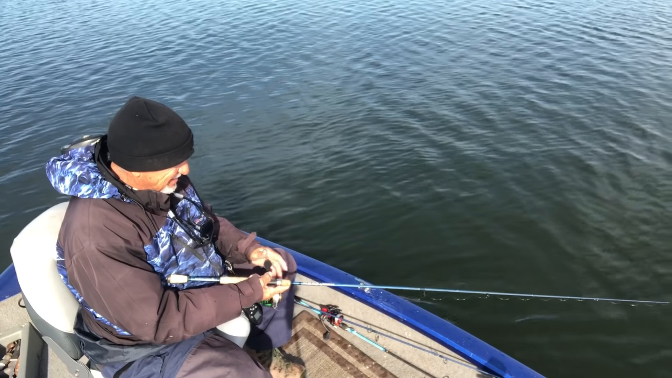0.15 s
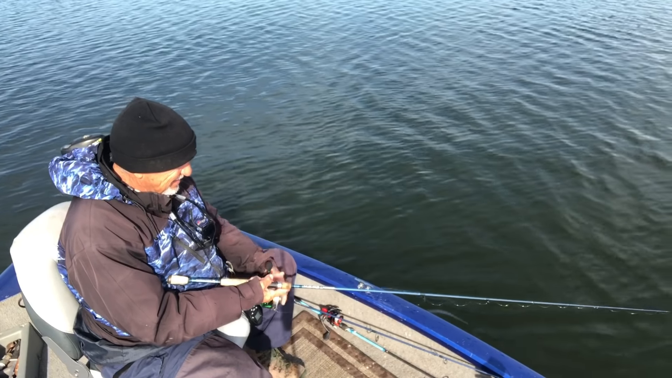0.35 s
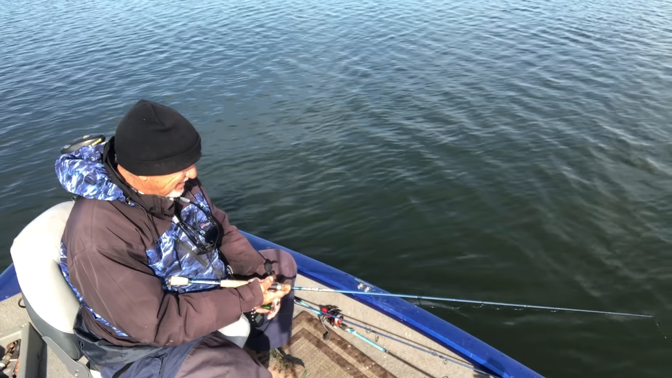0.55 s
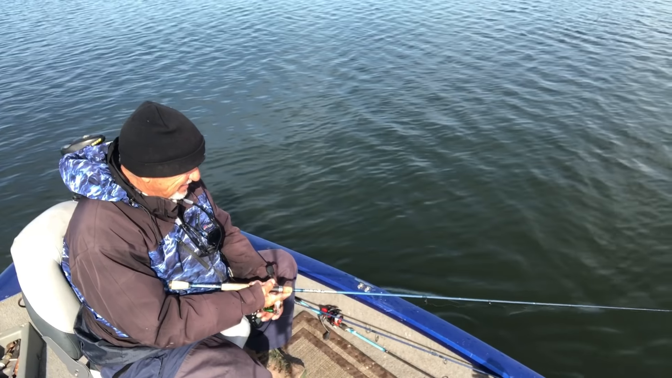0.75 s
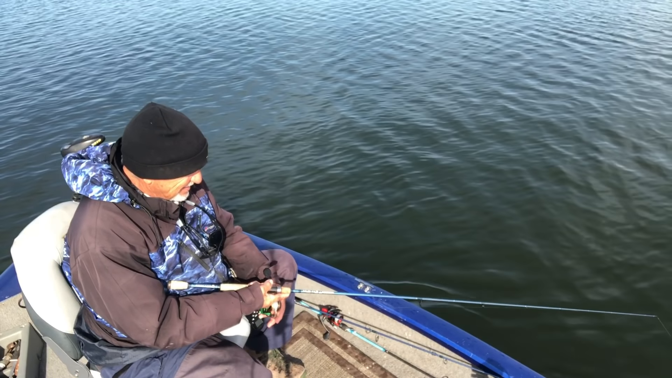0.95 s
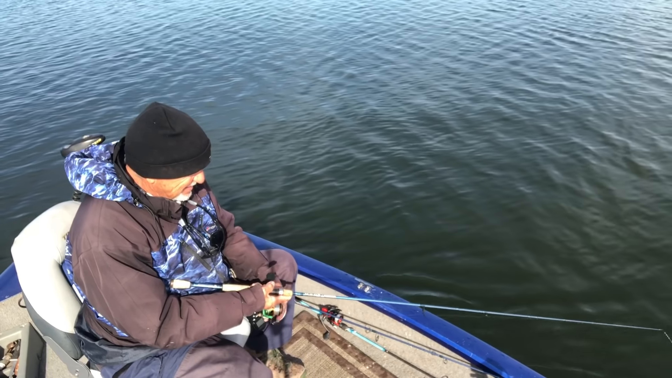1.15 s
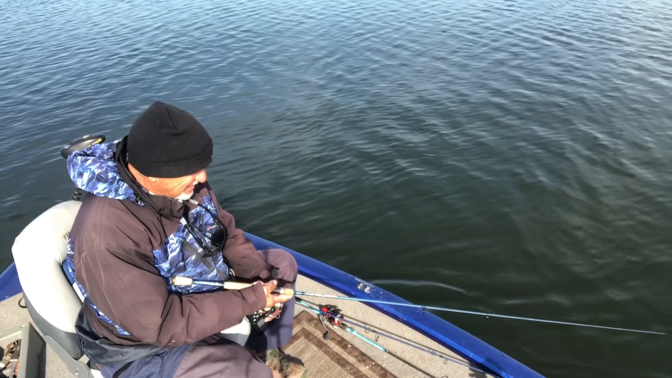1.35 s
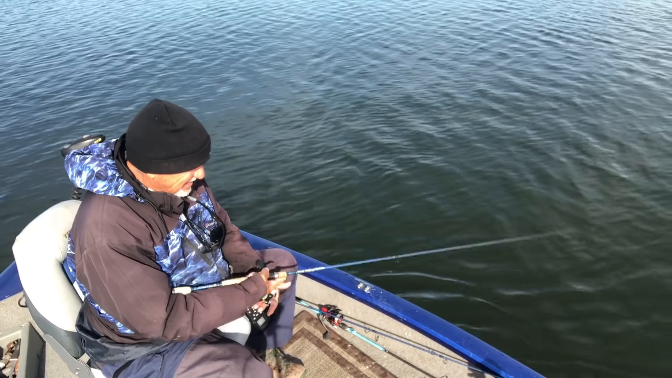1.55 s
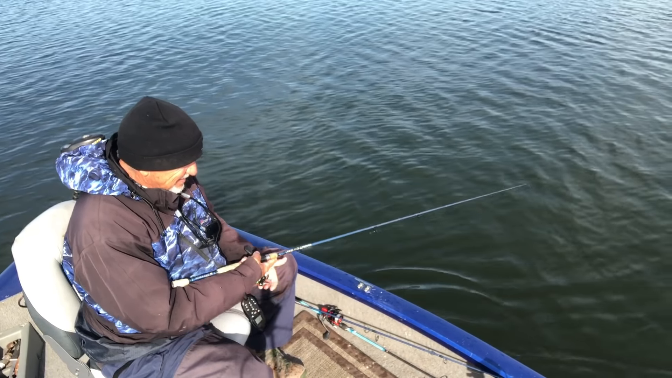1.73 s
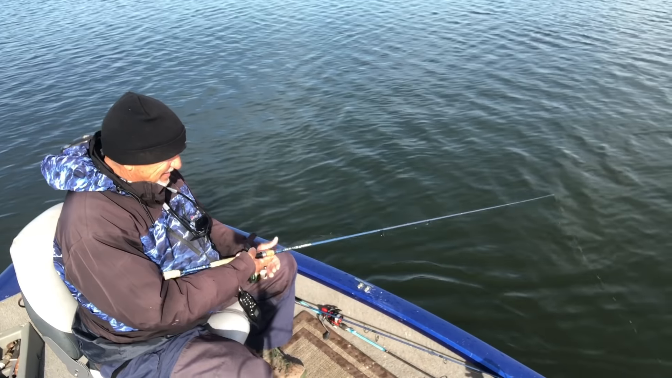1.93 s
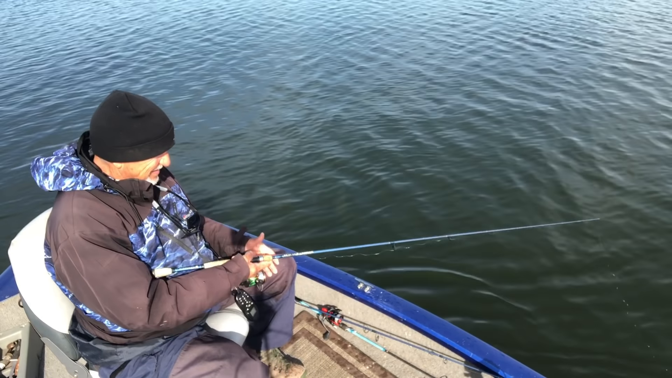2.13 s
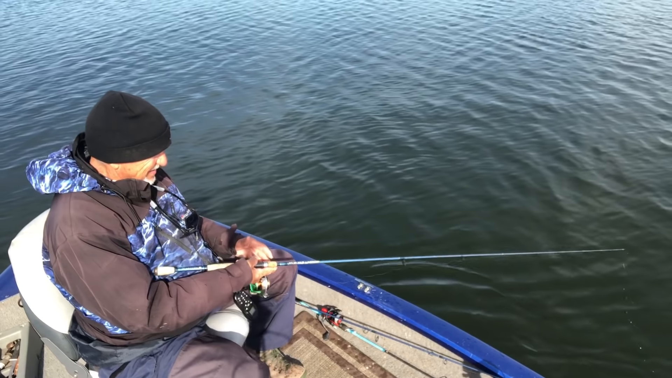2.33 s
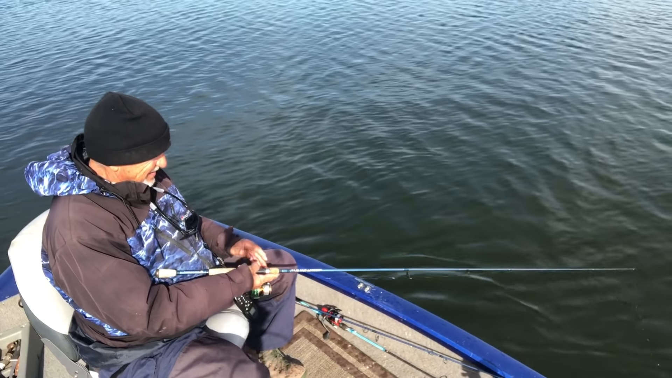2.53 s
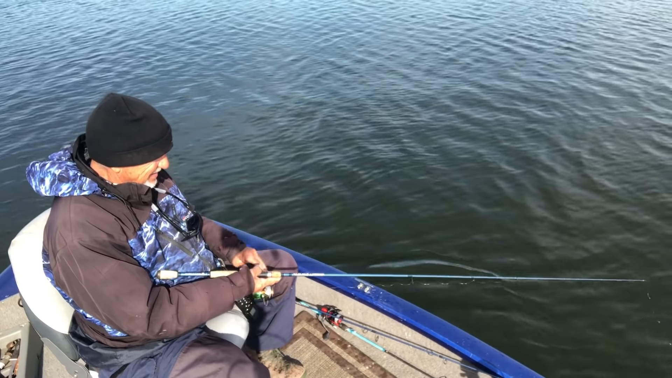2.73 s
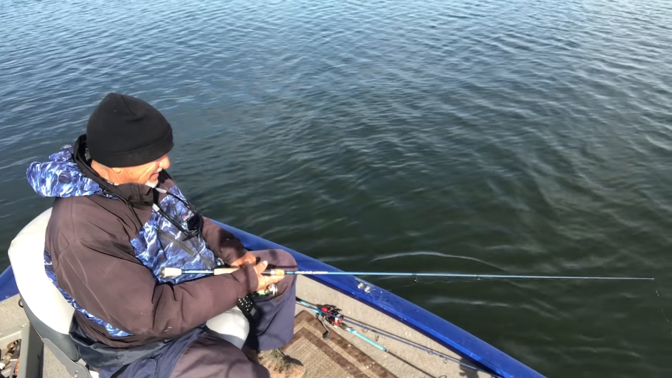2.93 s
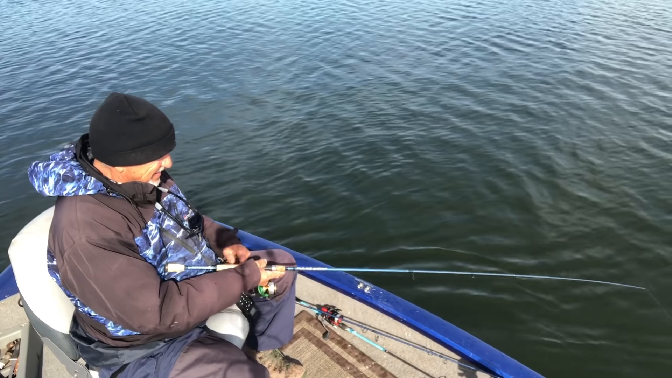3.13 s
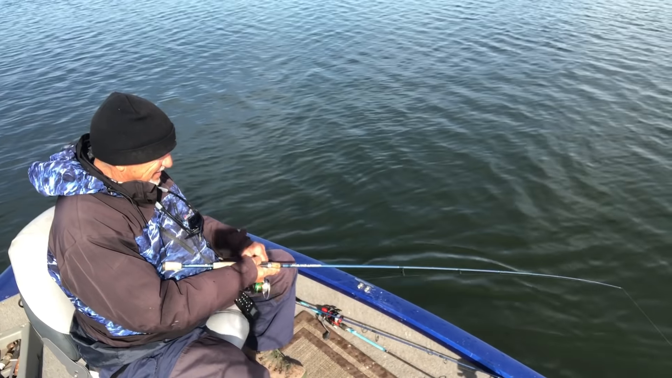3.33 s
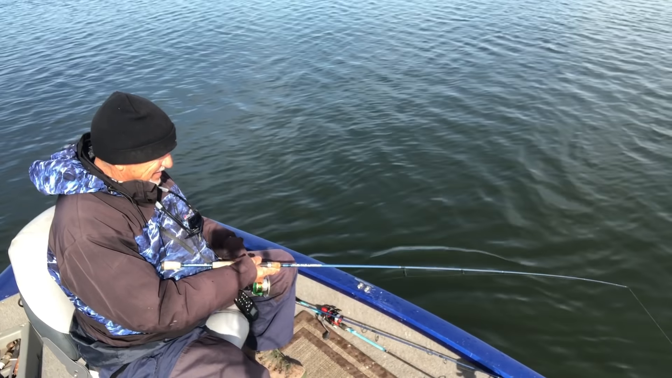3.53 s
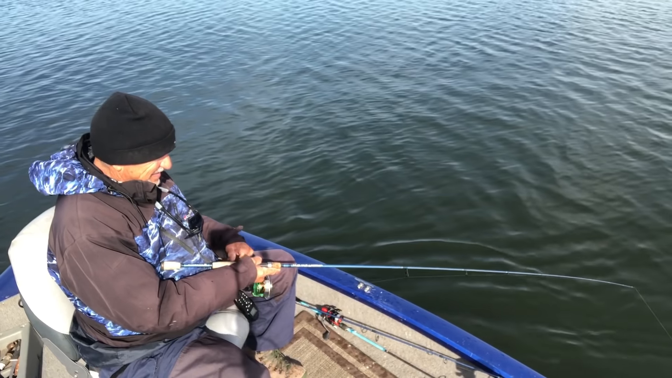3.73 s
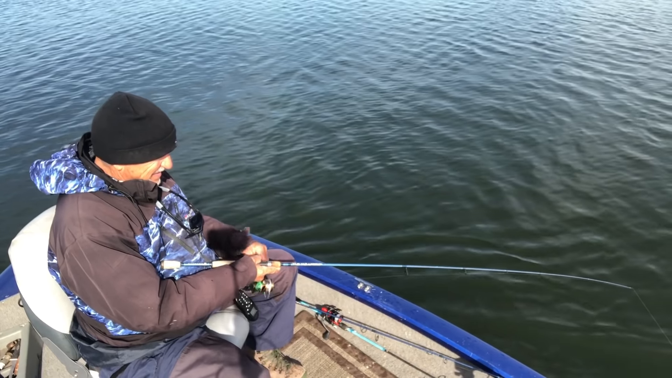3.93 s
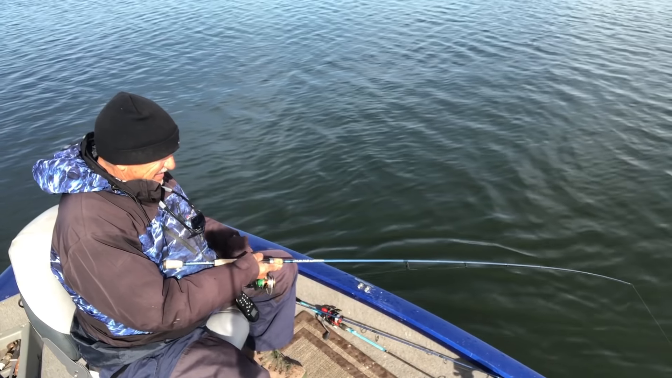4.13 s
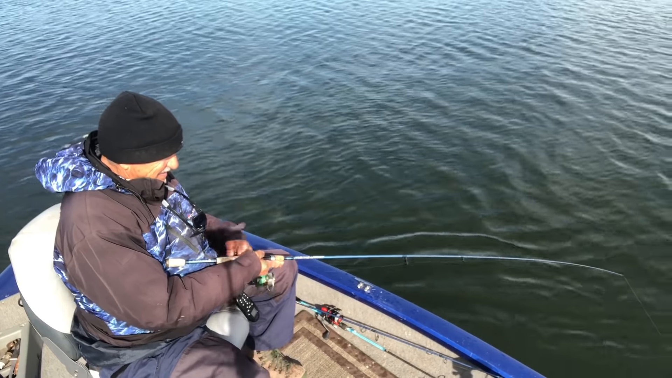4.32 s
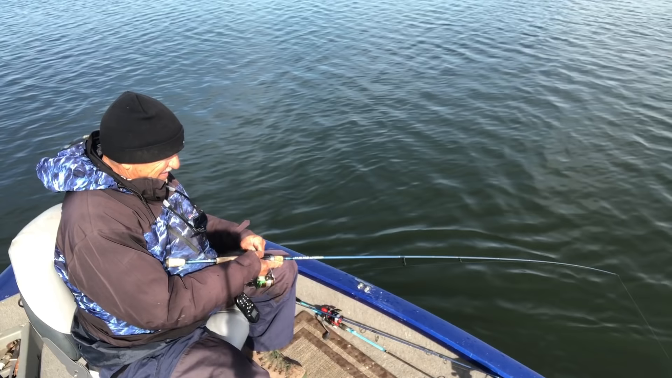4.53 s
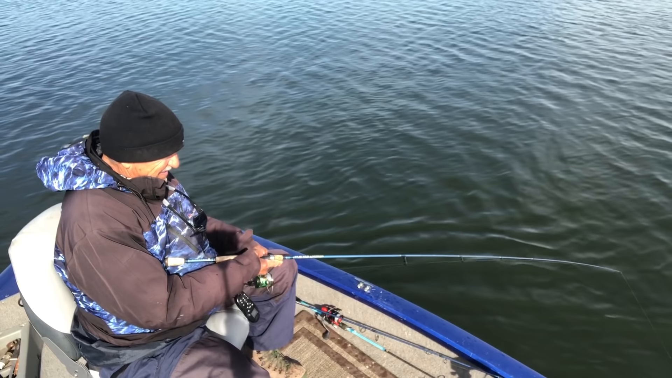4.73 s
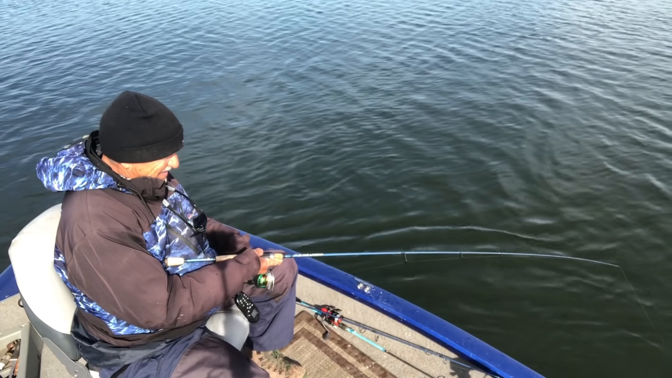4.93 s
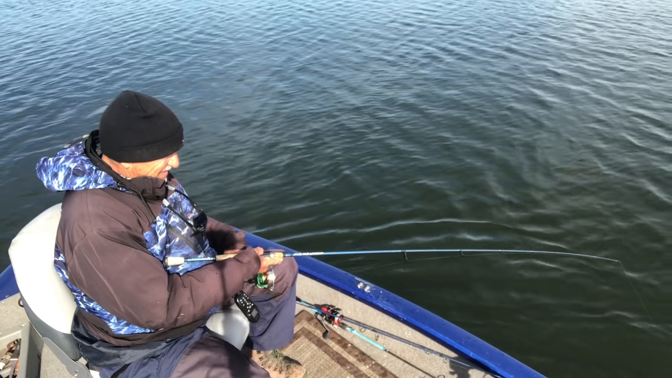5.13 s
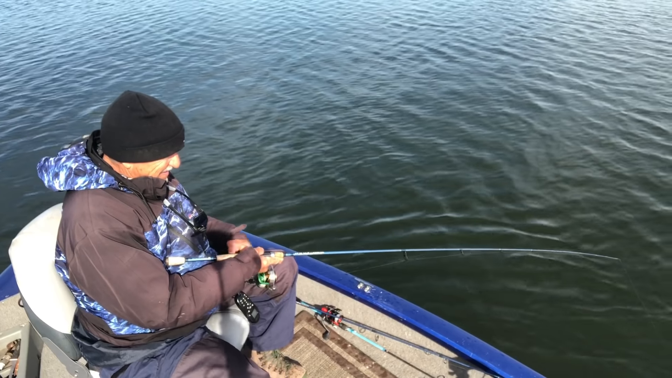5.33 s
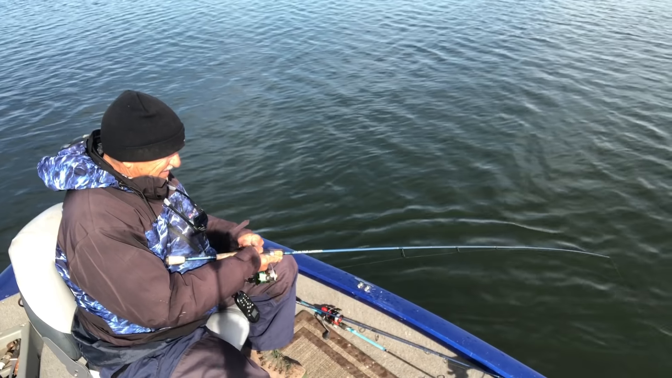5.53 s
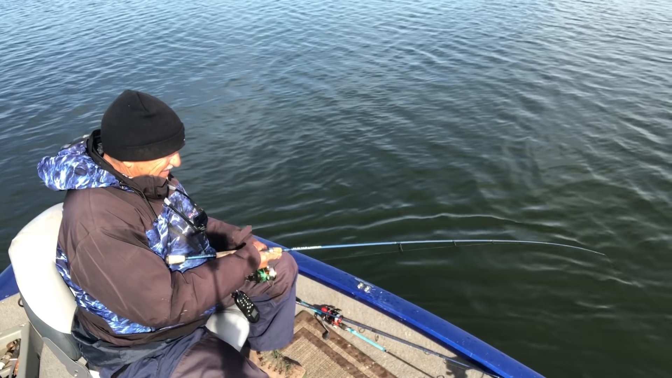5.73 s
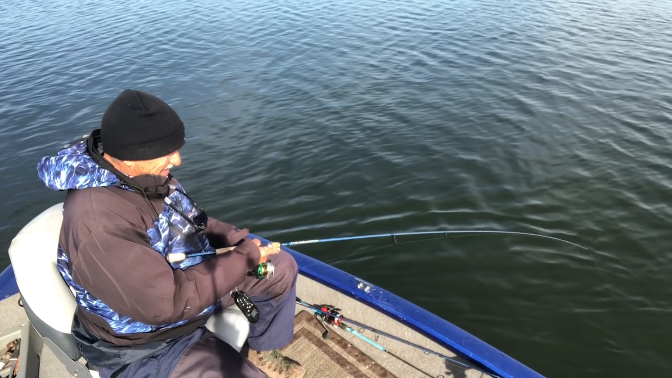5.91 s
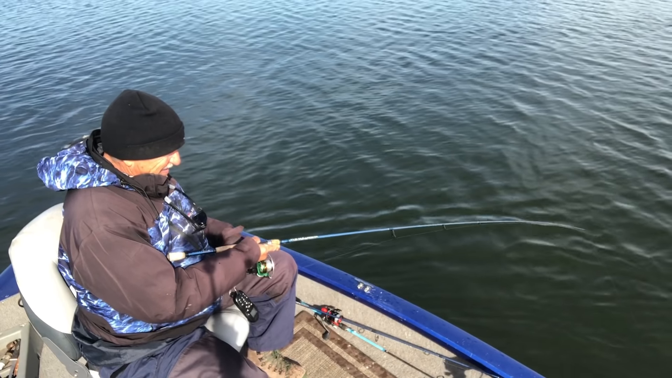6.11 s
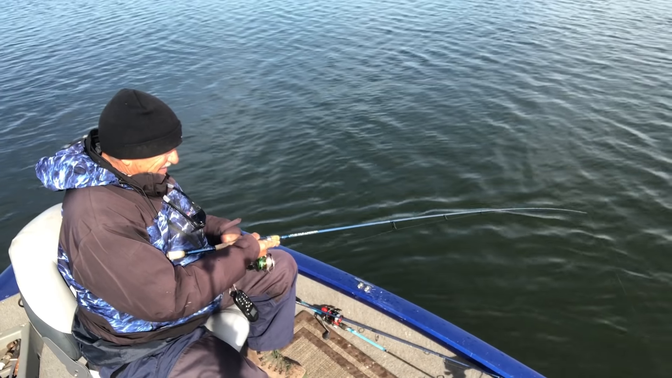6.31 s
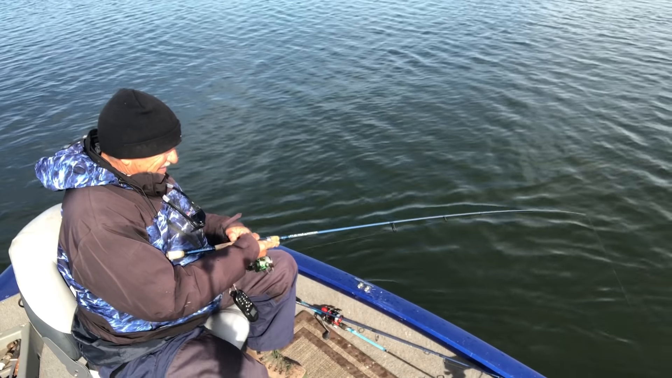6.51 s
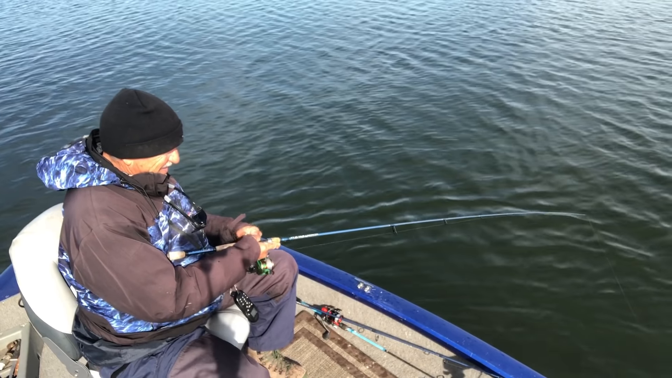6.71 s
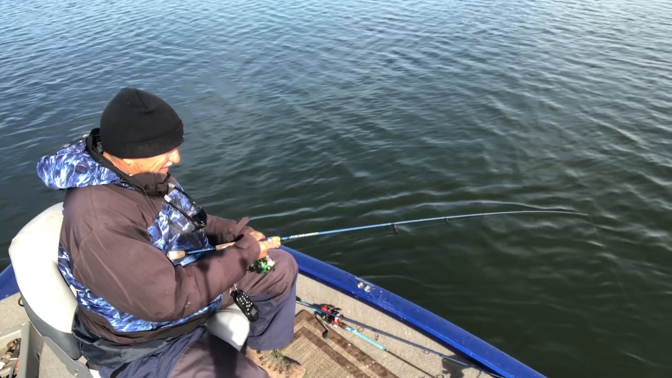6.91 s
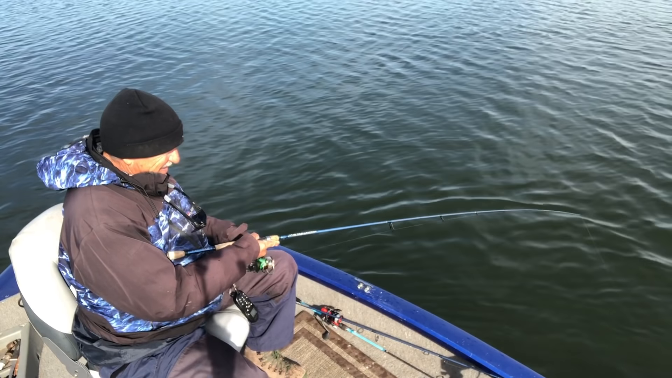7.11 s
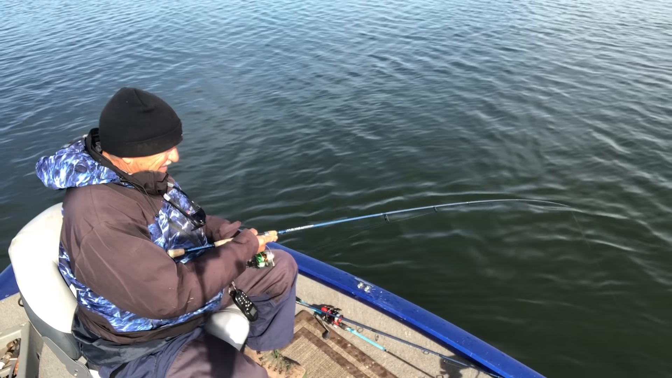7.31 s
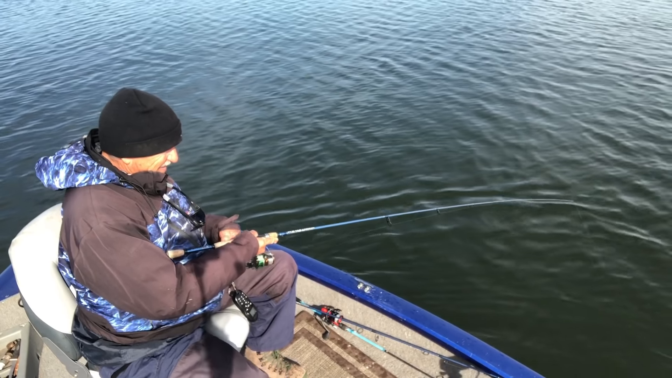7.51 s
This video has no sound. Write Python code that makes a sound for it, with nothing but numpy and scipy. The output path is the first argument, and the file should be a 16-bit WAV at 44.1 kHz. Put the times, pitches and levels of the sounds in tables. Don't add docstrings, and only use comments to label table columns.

```python
import sys
import numpy as np
from scipy import signal
from scipy.fft import rfft, irfft, next_fast_len
from scipy.io import wavfile
from scipy.ndimage import uniform_filter1d, map_coordinates

SR = 44100
rng = np.random.default_rng(int(sys.argv[2]) if len(sys.argv) > 2 else 0)


def magnitude_from_level(level_db):
    exponent = np.asarray(level_db, float) / 20
    return 10 ** exponent


def output_pcm(signal):
    pcm = np.clip(np.atleast_2d(signal).T, -1, 1) * 32767
    wavfile.write(sys.argv[1], SR, np.round(pcm).astype(np.int16))


N = 337806
T = np.arange(N) / SR


def unit(x):
    return x / np.sqrt(np.mean(x ** 2) + 1e-20)


def curves(rows):
    s, *cols = np.transpose(rows)
    return [np.interp(T, s, c) for c in cols]


def wobble(rate):
    return map_coordinates(rng.standard_normal(int(N * rate / SR) + 4), [T * rate])


def filtered(x, response):
    m = next_fast_len(len(x) + SR // 2)
    return irfft(rfft(x, m) * response(np.fft.rfftfreq(m, 1 / SR)), m)[:len(x)]


def colour(points):
    f, db = np.transpose(points)
    return lambda hz: magnitude_from_level(np.interp(np.log(hz + 1), np.log(f + 1), db))


def resonance(f, hz, width):
    return 1j * f * width / (hz * hz - f * f + 1j * f * width)


def alternating_modes(f, modes):
    return sum((-1) ** k * magnitude_from_level(db) * resonance(f, hz, w) for k, (hz, w, db) in enumerate(modes))


def rush(response, patchy_db, grain_db):
    z = signal.stft(rng.standard_normal(N), nperseg=512)[2]
    field = uniform_filter1d(rng.standard_normal(z.shape), size=6, axis=0)
    field = uniform_filter1d(field, size=10, axis=1)
    noise = signal.istft(z * magnitude_from_level(patchy_db * unit(field)), nperseg=512)[1][:N]
    return unit(filtered(noise * magnitude_from_level(grain_db * wobble(500)), response))


def stroke(s, hold, db, rise, fall, sag=0):
    rising = rise * np.clip(s - T, 0, 1)
    sagging = sag * np.clip(T - s, 0, hold)
    falling = fall * np.clip(T - s - hold, 0, 3)
    return magnitude_from_level(db - rising - sagging - falling)


# frequency in Hz, level in dB per Hz.
SWELL_COLOUR = [(20, -23), (38, -8.5), (60, -5.5), (120, -10), (200, -14.5), (400, -54)]
# frequency in Hz, level in dB per Hz.
LAPPING_COLOUR = [(76, -45), (130, -6.5), (194, 1), (269, -0.5), (492, -5.5), (591, -8.5), (1220, -21),
                  (1500, -37), (1950, -29), (3300, -120)]
# frequency in Hz, level in dB per Hz.
AIR_COLOUR = [(410, -45), (700, -8), (757, -4.5), (1080, -7.5), (1210, -8.5), (1330, -9.5), (1680, -8.5),
              (1820, -10.5), (2400, -9.5), (7200, -12), (16000, -22)]


def lake():
    swell_gain = magnitude_from_level(-50.5 + 0.43 * wobble(4.06))
    swell = swell_gain * rush(colour(SWELL_COLOUR), patchy_db=1.0, grain_db=0.5)
    lapping_gain = magnitude_from_level(-55.5 + 0.97 * wobble(6.4))
    lapping = lapping_gain * rush(colour(LAPPING_COLOUR), patchy_db=1.0, grain_db=0.0)
    air = magnitude_from_level(-60.5) * rush(colour(AIR_COLOUR), patchy_db=0.66, grain_db=1.0)
    return swell + lapping + air


# time in seconds, pitch in Hz, level in dB.
MOTOR_COURSE = [(6.12, 90.5, -71), (6.2, 95.8, -55), (6.4, 99.1, -51), (6.7, 96.2, -53), (7.1, 98.4, -46),
                (7.45, 95.5, -55), (7.66, 99.4, -45)]


def motor():
    hz, db = curves([(0, 92.5, -120), (6.0, 91.64, -120), *MOTOR_COURSE])
    phase = 2 * np.pi * np.cumsum(hz + 1.2 * wobble(15)) / SR
    unsteady_db = 1.8 * wobble(12)
    return magnitude_from_level(db + 8.5 + unsteady_db) * np.sin(phase)


# time of firmest contact in seconds, level in dB, hold in seconds.
SLEEVE_STROKES = [(0.303, -59, 0.19), (0.586, -61, 0.022), (0.973, -61, 0.015), (1.33, -67, .1),
                  (1.638, -52, 0.052), (1.74, -56.5, .03), (2.244, -60, 0.046), (1.9, -57.5, 0.064),
                  (5.9, -66, 0.19), (6.603, -67, .01), (7.2, -68, 0.36)]
# frequency in Hz, level in dB per Hz.
CLOTH_COLOUR = [(290, -21), (500, -2.5), (773, -8.5), (988, -8), (1210, -6), (1820, -10.5), (6230, -11),
                (16000, -30)]


def jacket():
    delay_s, jolt_db, follows = 0.037, -62, 0.62
    brushes = [stroke(s, hold, db, rise=100, fall=77) for s, db, hold in SLEEVE_STROKES]
    jolts = [stroke(s + delay_s, 0, jolt_db + follows * (db + 12.5), rise=500, fall=65)
             for s, db, *_ in HULL_BLOWS]
    flutter = magnitude_from_level(2.5 + 1.1 * wobble(25))
    return np.max(brushes + jolts, axis=0) * flutter * rush(colour(CLOTH_COLOUR), patchy_db=2.0, grain_db=0.5)


# start in seconds, length in seconds, effort in dB.
HANDLE_TURNS = [
    (3.001, 0.027, -52),
    (3.053, 0.052, -50.5),
    (3.157, 0.036, -53.5),
    (3.225, 1.26, -47),
    (4.492, .23, -52.5),
    (4.755, 0.07, -52.5),
    (4.917, 0.096, -55),
]
# frequency in Hz, width in Hz, level in dB.
REEL_BODY = [(4100, 1200, -6), (5200, 1000, -4.5), (6680, 850, 1), (8080, 350, -0.5)]
# frequency in Hz, level in dB per Hz.
WHIRR_COLOUR = [(880, -6), (1500, -5.5), (3220, -4.5), (3960, 1.5), (5770, 0.5), (6760, -7), (8160, -2.5),
                (11700, -13), (15100, -18), (16000, -5)]


def gears():
    turns = [stroke(s, hold, db, rise=350, fall=450, sag=1.7) for s, hold, db in HANDLE_TURNS]
    effort = np.max(turns, axis=0)
    body = lambda f: alternating_modes(f, REEL_BODY)
    teeth = magnitude_from_level(2.2 * wobble(60)) * rush(body, patchy_db=1.3, grain_db=3.5)
    wash = magnitude_from_level(2.5) * rush(colour(WHIRR_COLOUR), patchy_db=2.0, grain_db=2.5)
    return effort * magnitude_from_level(-7.5 + 0.49 * wobble(33)) * (teeth + wash)


# time in seconds, peak in dB.
DECK_TAPS = [
    (.083, -53),
    (.44, -49.5),
    (1.148, -42.5),
    (1.77, -52),
    (3.89, -42.5),
    (6.604, -41),
]
# frequency in Hz, level in dB, time to peak in seconds.
DECK_MODES = [(500, 5.5, 0.0037), (690, -2.5, 0.0032), (905, -6.5, 0.002)]


def taps():
    out, t = np.zeros(N + SR), np.arange(SR // 8) / SR
    for s, db in DECK_TAPS:
        chance = rng.standard_normal(len(DECK_MODES))
        ring = np.zeros(len(t))
        for (hz, level, rise), c in zip(DECK_MODES, chance):
            swelling = t / rise * np.exp(1 - t / rise)
            ring += magnitude_from_level(level + 0.68 * c) * swelling * np.sin(2 * np.pi * hz * t)
        out[round(s * SR):][:len(t)] += magnitude_from_level(db) * ring
    return out[:N]


# time in seconds, peak in dB, ring in Hz,
# t60 in seconds, click in dB relative to the ring.
TACKLE_TICKS = [(0.879, -51, 1320, .03, 5), (1.2362, -41, 1245, 0.064, -4), (1.645, -44.5, 746, .04, -6),
                (1.932, -25.5, 443, 0.045, -17), (1.932, -33, 1133, 0.039, -6),
                (2.2252, -43, 1400, 0.028, 4.5), (2.652, -49, 1310, .03, 10), (3.053, -45.5, 1520, .04, 11),
                (3.185, -47, 9200, .025, 3), (3.362, -75, 10000, .012, 16), (4.6114, -47, 4940, 0.019, 11),
                (5.204, -54, 1400, .02, 10), (6.737, -41.5, 1470, 0.02, 3),
                (.581, -50, 3800, .008, 6), (1.2333, -42, 3900, .012, 7), (3.1655, -49, 10000, .005, 8),
              (4.378, -46, 900, .012, 6), (4.6088, -42, 1800, .045, 0), (4.6085, -43, 2950, .03, 8),
              (4.611, -45, 2400, .03, 0), (1.003, -57, 6500, .006, 8), (5.16, -60, 12000, .004, 8),
              (5.224, -44, 2700, .012, 6), (5.4012, -57, 7500, .006, 6)]


def ticks():
    out, t = np.zeros(N + SR), np.arange(SR // 8) / SR
    for s, db, hz, t60, click_db in TACKLE_TICKS:
        onset = 1 - np.exp(-t / 0.00017)
        ring = magnitude_from_level(-60 * t / t60) * onset * np.sin(2 * np.pi * hz * t)
        noise = magnitude_from_level(click_db - 60 * t / (.4 * t60 + .004)) * rng.standard_normal(len(t))
        click = filtered(noise, lambda f: 1.2 * resonance(f, 1.2 * hz, 1.6 * hz) ** 2)
        out[round(s * SR):][:len(t)] += magnitude_from_level(db) * (ring + click)
    return out[:N]


# time in seconds, peak in dB, scrape length in seconds.
BAIL_CONTACTS = [
    (1.922, -28, 0.0025),
    (1.9248, -13, 0.012),
    (1.933, -47, 0.0058),
    (1.956, -25, 0.0012),
    (1.9597, -23, 0.0021),
    (1.9628, -27, .002),
]
# frequency in Hz, level in dB per Hz.
SNAP_COLOUR = [(410, -30), (700, -17.5), (1640, -14), (2160, -4), (3240, -6.5), (3690, -2), (6070, -1),
               (11800, -13), (16000, -22)]
# frequency in Hz, width in Hz, level in dB.
WIRE_MODES = [(2165, 89, -5.5), (4630, 240, -28), (5360, 350, -12), (6450, 250, -21)]
# frequency in Hz, level in dB per Hz.
COCKPIT_COLOUR = [(300, -25), (480, 10), (1500, -15), (4600, -10), (8500, -15), (12000, 1), (16000, -26)]
# start in seconds, level in dB, frequency in Hz, t60 in seconds.
SPRING_RING = (1.93, -49, 11915, .3)


def bail():
    spikes = rng.standard_normal(N) * magnitude_from_level(2.6 * wobble(2500))
    contact = np.zeros(N)
    for s, db, length in BAIL_CONTACTS:
        contact += magnitude_from_level(db) * (T > s) * np.exp(-np.clip((T - s) / length, 0, 9) ** 3)
    scrape = contact * unit(filtered(spikes, colour(SNAP_COLOUR)))
    late = lambda f: np.exp(-2j * np.pi * .16 * np.sqrt(f))
    ring = lambda f: late(f) / late(16040) * (1 + magnitude_from_level(3) * alternating_modes(f, WIRE_MODES))
    direct = np.roll(filtered(scrape, ring), -32)
    t = T[:SR // 8]
    tail = magnitude_from_level(-60 * t / 0.057) * filtered(rng.standard_normal(len(t)), colour(COCKPIT_COLOUR))
    smear = signal.fftconvolve(scrape, tail / np.linalg.norm(tail))[:N]
    s, db, hz, t60 = SPRING_RING
    spring = (T > s) * magnitude_from_level(db - 60 * np.abs(T - s) / t60) * np.sin(2 * np.pi * hz * T)
    return magnitude_from_level(-7) * (direct + magnitude_from_level(-1.0) * smear) + spring


# frequency in Hz, level in dB per Hz.
PANEL_COLOUR = [(90, -30), (160, 12.5), (280, 2.5), (500, -5.5), (800, -14), (1100, -18), (1600, -50)]
# frequency in Hz, level in dB per Hz.
TACKLE_COLOUR = [(600, -7), (950, -5), (1270, 7), (1700, -5), (4500, -5.5), (8000, -11), (15000, -22)]


def rattle(shake):
    motion = np.sqrt(np.abs(uniform_filter1d(shake ** 2, size=900)))
    panels = magnitude_from_level(-30.0) * motion ** 0.64 * rush(colour(PANEL_COLOUR), patchy_db=1.5, grain_db=1.0)
    tackle = magnitude_from_level(-42.0) * motion ** 0.81 * rush(colour(TACKLE_COLOUR), patchy_db=1.3, grain_db=3.0)
    return panels + tackle


# time in seconds, force in dB, contact corner in Hz (high is hard),
# high-mode level in dB (set by where it lands).
HULL_BLOWS = [(2.2182, -19, 700, 4.5), (2.439, -11, 1000, 0), (2.6426, -10, 690, -1),
              (2.8277, -16, 338, -2), (3.0357, -10.5, 700, -0.5), (3.231, -12, 670, -6.5),
              (3.427, -15.5, 500, -1.5), (3.6291, -9.5, 360, -2), (3.8198, -12.5, 696, -2.5),
              (4.0219, -10, 690, -1.5), (4.2111, -12, 500, -2), (4.4052, -12.5, 500, -1.5),
              (4.601, -11.5, 362, 1.5), (4.7991, -11.5, 360, 4), (4.9916, -11.5, 357, 3.5),
              (5.1857, -13.5, 258, 5.5), (5.3867, -11, 690, 0.5), (5.5834, -12, 355, 3.5),
              (5.772, -18.5, 247, -6), (5.9619, -17.5, 128, -11), (6.7109, -11.5, 980, -0.5),
              (6.9214, -16.5, 176.5, -4), (7.112, -22, 130, -14), (7.3047, -22, 89.7, 9),
              (7.5668, -10.5, 710, 4)]
# frequency in Hz, width in Hz, level in dB,
# direction of motion +1 or -1.
HULL_MODES = [(55.4, 12.0, 33.6, 1), (77.9, 26.8, 38.4, -1), (87.2, 10.1, 39.0, 1), (97.2, 9.5, 35.6, 1),
              (111.0, 7.0, 27.7, -1), (115.4, 12.3, 30.6, 1), (131.6, 7.9, 28.3, -1),
              (146.5, 17.9, 26.7, -1), (170.4, 18.5, 37.8, -1), (173.2, 28.5, 36.9, 1),
              (196.7, 18.0, 19.2, -1), (212.2, 4.4, 8.9, -1), (233.0, 12.6, 23.8, 1),
              (245.7, 36.3, 32.1, -1), (247.0, 23.9, 32.9, 1), (296.4, 4.4, 5.3, -1),
              (309.1, 11.8, 12.0, 1), (315.9, 12.0, 14.6, -1), (345.4, 31.8, 27.1, -1),
              (347.9, 20.7, 24.4, 1), (361.4, 46.6, 21.7, 1), (403.7, 4.0, -1.8, 1), (432.3, 22.1, 4.8, 1),
              (457.0, 21.9, 10.4, 1), (487.2, 12.0, 6.4, -1), (567.0, 112.7, 10.2, -1),
              (586.5, 95.4, 12.8, 1), (663.1, 33.7, -0.9, 1), (756.8, 14.9, -15.4, -1)]
# frequency in Hz, width in Hz, level in dB.
ROCKING_MODE = (50, 9.7, 15.4)


def hull():
    mid_db = 0.4
    force, kick = np.zeros(N + SR), np.arange(SR // 10) == 0
    for s, db, corner_hz, high_db in HULL_BLOWS:
        middle = lambda f: (magnitude_from_level(mid_db) - 1) * resonance(f, 230, 90)
        high = lambda f: (magnitude_from_level(high_db) - 1) * resonance(f, 543, 370)
        blow = lambda f: (1 + middle(f) + high(f)) / (1 + 1j * f / corner_hz) ** 2
        pulse = filtered(kick * magnitude_from_level(db + 20.0), blow)
        force[round(s * SR):][:len(pulse)] += pulse
    modes = [*HULL_MODES, (*ROCKING_MODE, 1)]
    return filtered(force[:N], lambda f: sum(way * magnitude_from_level(db) * resonance(f, hz, w) for hz, w, db, way in modes))


def scene():
    knocks = hull()
    background = lake() + motor() + jacket()
    handling = gears() + taps() + ticks() + bail()
    return (background + handling + rattle(knocks) + knocks)[None]


def band_limit(x):
    return signal.sosfilt(signal.butter(12, 16480, fs=SR, output="sos"), x)


def record(dry):
    band = lambda f: (1j * f / (45 + 1j * f)) ** 3 * (f < 15720)
    x = filtered(dry[0], band)
    squeezed = x / (1 + np.abs(x / .5) ** 1.96) ** (1 / 3.9)
    return band_limit(squeezed[None])


dry = scene()
out = record(dry)
output_pcm(out)
```